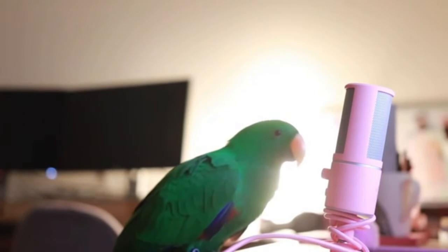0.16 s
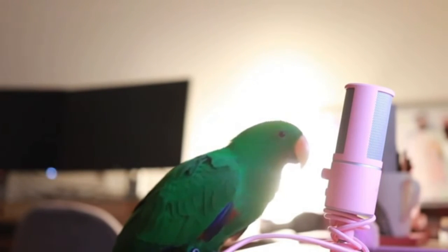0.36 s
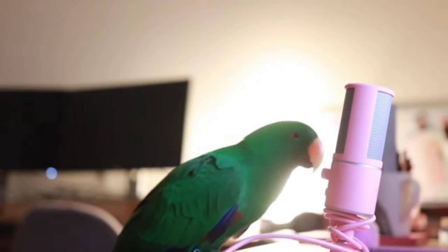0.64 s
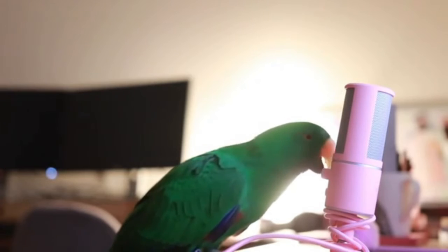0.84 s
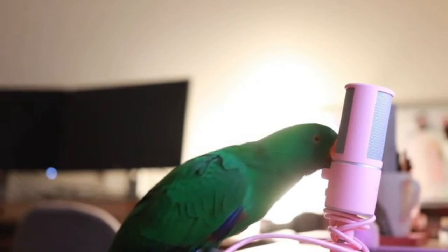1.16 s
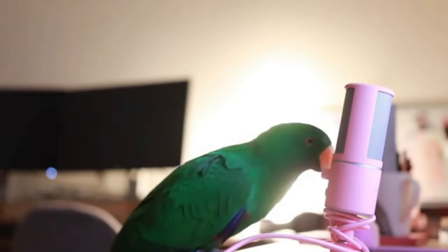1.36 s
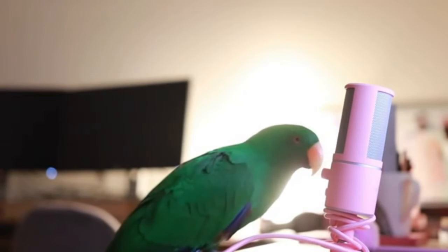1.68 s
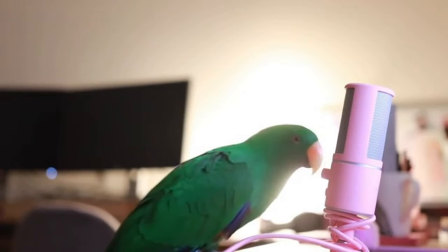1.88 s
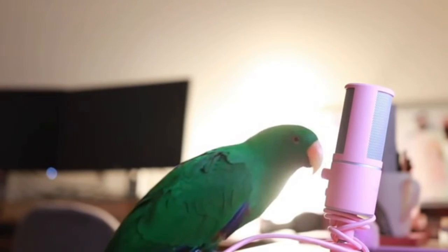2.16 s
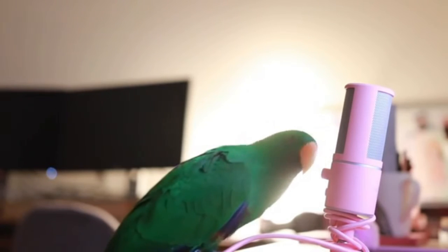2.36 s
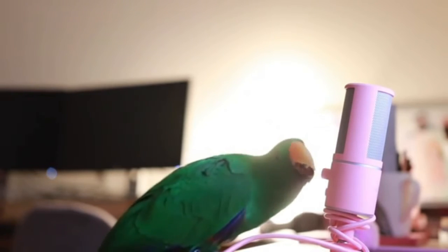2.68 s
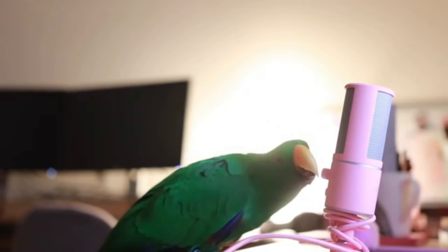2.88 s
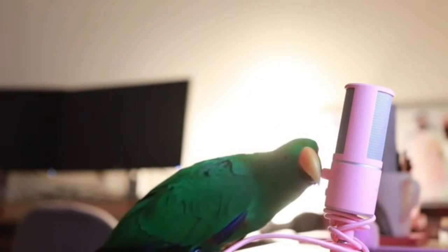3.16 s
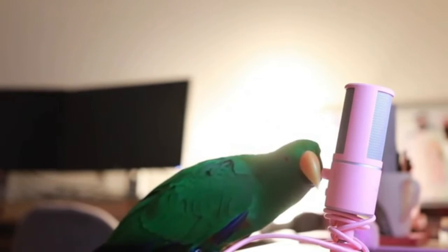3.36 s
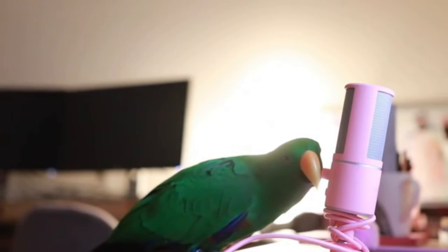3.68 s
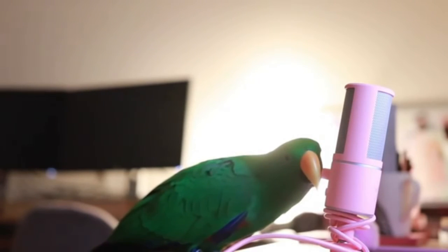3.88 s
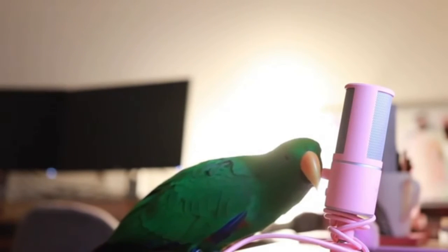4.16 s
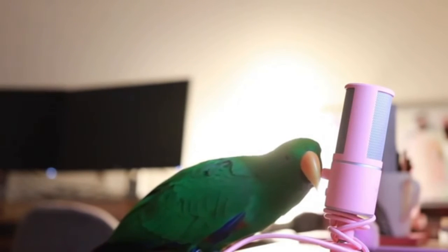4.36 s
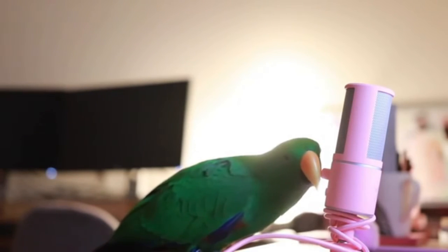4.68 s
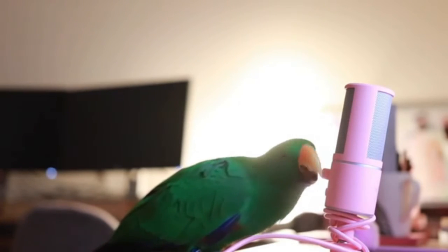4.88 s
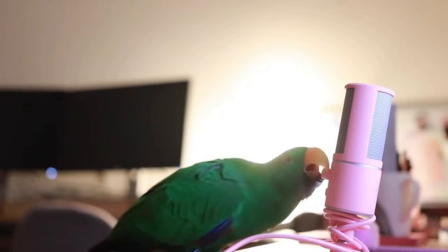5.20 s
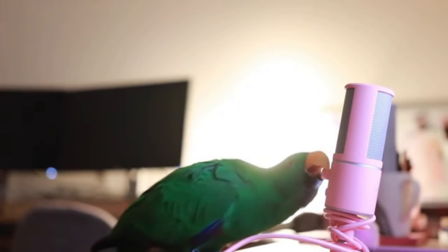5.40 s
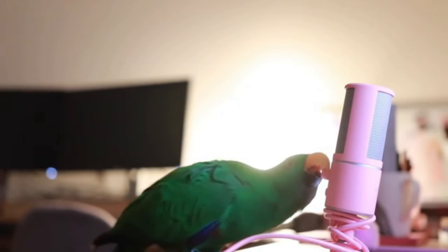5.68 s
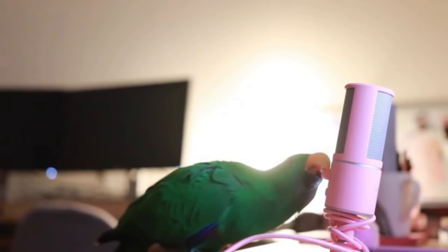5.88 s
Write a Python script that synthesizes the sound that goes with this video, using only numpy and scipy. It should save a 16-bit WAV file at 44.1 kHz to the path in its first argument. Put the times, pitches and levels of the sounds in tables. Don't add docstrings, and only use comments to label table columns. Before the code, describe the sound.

A parrot handles a sprung desk microphone with its beak. At first there is only quiet house hum, airy fan noise and tiny ticks, broken by a sudden clipped squawk. After a calm gap, nudges make the mount thud and sway with a deep rumble. Popping, hollow clucks come at regular intervals and grow strong, then the beak scrapes, knocks and creaks the ringing casing. Close, dry sound with short room echoes.

```python
import sys
import numpy as np
from scipy import signal
from scipy.fft import rfft, irfft
from scipy.io import wavfile
from scipy.ndimage import uniform_filter1d

SR = 44100
rng = np.random.default_rng(int(sys.argv[2]) if len(sys.argv) > 2 else 0)


def to_wav(sig):
    pcm = np.clip(np.atleast_2d(sig), -1, 1) * 32767
    pcm = np.round(pcm).astype(np.int16)
    wavfile.write(sys.argv[1], SR, pcm.T)


def volts_from_db(level):
    exponent = np.asarray(level, float) / 20
    return 10 ** exponent


N = 266364
T = np.arange(N) / SR

# pitch_hz, level_db (per Hz)
HUM = [(12, -27), (20, -1.5), (32, -2.5), (49, -15), (97, -6.5), (141, -13), (166, -20.5), (269, -17),
       (409, -27), (500, -27), (650, -56), (1100, -120)]
# pitch_hz, level_db (per Hz)
AIR = [(290, -28.5), (500, 0), (545, -10.5), (576, -5), (823, -3.5), (1020, -5.5), (1390, -5), (1680, -9),
       (2170, -5), (2760, -14), (3410, -12.5), (4740, -21.5), (6210, -26.5), (15000, -30.5)]
HUM_DB, AIR_DB = -48.5, -62.5
# start_s, length_s, start_level_db, end_level_db
RUFFLES = [
    (0.303, .65, -95.5, -73),
    (0.973, 0.59, -79, -78),
    (2.491, 0.34, -71.5, -69.5),
    (2.875, 0.031, -68, -71),
    (2.917, .16, -74, -71),
    (5.42, .3, -74, -74),
    (5.8, .24, -74, -72),
]
RUFFLE_ATTACK_S, RUFFLE_RELEASE_S = 0.02, 0.023
# start_s, peak_db, centre_hz,
# casing_share_db
TICKS = [(0.7389, -54, 2160, -3), (1.3294, -52, 2220, -13.5), (1.4552, -22, 2561, -29.5),
         (2.815, -47, 2100, -17), (2.8842, -38.5, 2160, -25), (2.9078, -38, 2080, -17),
         (3.1864, -41.5, 2210, 3), (3.2476, -51, 2170, 3), (3.527, -34.5, 2130, -9.5),
         (4.8878, -32, 1700, -23), (4.9523, -32.5, 2280, -4), (5.1482, -19, 4150, -4),
         (5.3579, -29.5, 2240, -14), (5.5122, -41.5, 2500, -23), (5.7075, -39.5, 2100, -5),
         (5.7413, -33, 2320, -8.5), (5.8167, -44.5, 2220, 4.5), (5.908, -39.5, 2580, -26)]
# start_s, peak_db, centre_hz
SNAPS = [(1.33, -58, 6000), (2.8875, -45.5, 5970), (2.908, -45, 5200), (3.1873, -44, 7260),
         (4.8883, -46, 6160), (5.1062, -41, 9700), (5.1454, -43, 6440), (5.356, -41.5, 5975),
         (5.487, -51, 4860), (5.7412, -43.5, 8050), (5.817, -48, 6160)]
TICK_DIE_MS, SNAP_DIE_MS, SNAP_RING_DB = 1.5, 0.7, -20
# pitch_hz, width_hz, level_db
CASING = [(417, 51, -12), (690, 47, -6), (945, 50, -8), (1220.4, 65, -8), (1610, 70, -6.5),
          (2220, 90, -1.5), (2500, 22, -16.5), (3004, 34, -19.5), (2990, 190, -16.5), (4150, 85, -4),
          (4280, 75, -13.5), (5602, 150, -27), (6160, 207.2, -26)]
# start_s, end_s, pitch_hz, slack_s (pitch lets go), slowing_s (period grows e-fold), level_db
SQUAWK = (1.4579, 1.4912, 1585, 1.4733, 0.0085, 10.1)
# pitch_hz, width_hz, level_db
SQUAWK_THROAT = [(605, 740, -7.5), (1450, 800, -0.5), (2160, 650, -7), (3150, 700, 1.5), (4350, 620, -6)]
# pitch_hz, width_hz, level_db
SLACK_THROAT = [(596, 600, -6), (1380, 950, -3), (2246, 1100, -0.5), (3200, 300, 0.5), (4370, 2200, -8.5)]
# pitch_hz, time_to_fall_60_db_s, level_db
ROOM = [(398.6, 0.21, -34), (860, 0.47, -34.5), (1600, 0.52, -37), (2300, 0.28, -35), (3205, .45, -35),
        (4700, .4, -31.5), (6300, 0.27, -33), (10853, .12, -24)]
SCATTER_HZ, SCATTER = 1700, 0.55
# start_s, peak_db, pitch_hz,
# time_to_fall_60_db_s
THUMPS = [(1.488, -31, 94.97, 0.2), (3.186, -16, 117, 0.13), (3.25, -25.5, 102.7, 0.078),
          (3.645, -33.5, 132.7, 0.14), (3.847, -36.5, 145, 0.46), (5.036, -26.5, 131, 0.19),
          (5.082, -26.5, 123.8, 0.1), (5.147, -15.5, 114.5, 0.12), (5.358, -13.5, 120, 0.088),
          (5.499, -27.5, 73.4, 0.1), (5.638, -22.5, 124, 0.089), (5.740, -17.5, 74.7, 0.029),
          (5.933, -21, 100, 0.081), (5.978, -25, 120.6, 0.074)]
# start_s, length_s, start_level_db, end_level_db
SWAYS = [
    (3.2, .3, -32.5, -43),
    (3.52, 0.19, -43, -42.5),
    (3.83, 0.069, -44, -48),
    (4.06, 0.18, -48.5, -41.5),
    (4.31, 0.049, -42, -41.5),
    (4.4, .2, -48.5, -49),
    (4.64, .4, -43, -44),
    (5.15, 0.11, -48.5, -35),
    (5.35, 0.46, -37, -37.5),
    (5.88, 0.14, -36, -38),
]
SWAY_HZ, SWAY_ATTACK_S, SWAY_RELEASE_S = 29.8, 0.01, 0.014
LEAN_FROM_S, LEAN_DB, SHAKE_PER_RUB, SHAKE_DB = 3.19, -48.5, 0.58, -15.5
# start_s,
# length_s, level_db, centre_hz
CREAKS = [(3.185, 0.0052, -39.5, 718), (3.247, .045, -47, 1130), (3.317, .1, -52, 426),
          (3.395, 0.064, -54.5, 713), (3.498, 0.039, -50, 450), (4.948, 0.091, -49, 1170),
          (4.953, 0.089, -47.5, 477), (5.189, .035, -57.5, 890), (5.262, .09, -50.5, 840),
          (5.638, 0.016, -55, 750), (5.943, 0.061, -51.5, 542)]
CREAK_WIDTH, CREAK_EDGE_S = 0.3, 0.0037
# start_s, length_s, start_level_db, end_level_db, body_pressure_db
STROKES = [(3.188, 0.01, -71, -70, -5), (3.251, 0.048, -56.5, -60, 4.5), (3.367, 0.038, -72, -62, 8),
           (3.417, 0.087, -57.5, -69.5, 2.5), (3.518, 0.037, -59.5, -61, 3), (4.185, .015, -77, -71, -6),
           (4.259, 0.021, -80, -66.5, 12), (4.35, .02, -67, -72, -4), (4.598, 0.03, -68.5, -63.5, 3),
           (4.767, .018, -75, -78, 4), (4.905, 0.052, -62, -51, -2.5), (4.957, 0.132, -53.5, -46, 1),
           (5.155, 0.0091, -33, -60, -7.5), (5.193, 0.025, -61, -56.5, -6), (5.268, 0.083, -55, -46, 1),
           (5.349, 0.012, -49, -50.5, -3), (5.389, .23, -70.5, -69.5, -0.5), (5.628, .018, -68.5, -58, 0),
           (5.706, .015, -65, -82, 7), (5.741, 0.025, -61, -73, 4), (5.797, 0.055, -64, -63.5, -1),
           (5.927, 0.076, -66.5, -64, 4.5), (6.018, 0.026, -68, -75.5, -1)]
STROKE_ATTACK_S, STROKE_RELEASE_S = 0.004, 0.0045
# pitch_hz, level_db (per Hz)
CASING_SKIN = [(150, -29.5), (250, -12.5), (1220, -18), (1350, -14.5), (2200, -5), (3300, -15.5),
               (4230, -13), (5010, -24.5), (14000, -45)]
SPOT_RATE_HZ, SPOT_DB = 16, 3.5
# start_s (opening pulse), peak_db, pitch_hz, rise_per_ms, hold_ms
CLUCKS = [
    (3.6090, -17, 1750, 0.19, 1.4),
    (3.7873, -11.5, 1450, 0.15, .9),
    (3.9531, -11, 1497, 0.023, 0.87),
    (4.1126, -7, 1450, 0.0098, 0.99),
    (4.2783, -5.5, 1450, 0.024, 0.97),
    (4.4468, -6, 1625, 0.058, 1.7),
    (4.6176, -3, 1610, 0.051, 2.66),
    (4.7849, 0.5, 1478, 0.09, 4.23),
]
CLUCK_DIE_MS = 0.59
# pitch_hz, width_hz, level_db
BEAK_CAVITY = [(5000, 780, 2.5), (6340, 590, 7.5), (11710, 860, -12)]
# pitch_hz, width_hz, level_db
CHEST = [(401, 180, 4.5), (1136, 150, -1)]
# delay_ms, level_db
DESK = [(1.448, -19), (2.6, -24.5), (4.1, -24)]


def level(x, db):
    return x * volts_from_db(db) / np.sqrt(np.mean(x ** 2))


def ring(x, hz, width):
    return signal.lfilter(*signal.iirpeak(hz, hz / max(width, 5), SR), x)


def narrow(x, hz, width):
    return ring(ring(x, hz, width), hz, min(9 * width, hz))


def body(x, modes):
    return sum((-1) ** k * volts_from_db(db) * ring(x, hz, width) for k, (hz, width, db) in enumerate(modes))


def coloured(x, points):
    hz, db = np.transpose(points)
    f = np.maximum(np.fft.rfftfreq(len(x), 1 / SR), 1)
    return irfft(rfft(x) * volts_from_db(np.interp(np.log(f), np.log(hz), db)), len(x))


def walk(rate):
    k = int(SR / rate)
    steps = np.repeat(rng.standard_normal(N // k + 1), k)
    return uniform_filter1d(uniform_filter1d(steps, k), k)[:N] * 4 / 3


def held(start, length, from_db, to_db, attack, release):
    before = np.minimum(T - start, 0)
    after = np.maximum(T - start - length, 0)
    slide = volts_from_db(np.interp(T, [start, start + length], [from_db, to_db]))
    return slide * np.exp(before / attack - after / release)


def add(out, s, x):
    i = int(s * SR)
    out[i:i + len(x)] += x[:len(out) - i]


def air():
    hum = level(coloured(rng.standard_normal(N), HUM), HUM_DB) * volts_from_db(1.5 * walk(2.5))
    hiss = level(coloured(rng.standard_normal(N), AIR), AIR_DB)
    ruffles = volts_from_db(-90) + sum(held(*row, RUFFLE_ATTACK_S, RUFFLE_RELEASE_S) for row in RUFFLES)
    rustle = level(ring(rng.standard_normal(N), 5600, 9000), -2.5) * ruffles * volts_from_db(1.2 * walk(30))
    whine = level(ring(rng.standard_normal(N), 6400, 900), -83.5)
    top = signal.butter(10, 14900, fs=SR, output="sos")
    return signal.sosfilt(top, hum + hiss + rustle + whine)


def ticks():
    knocks, clicks, t = np.zeros(N), np.zeros(N), np.arange(512) / SR
    hits = [(*row, TICK_DIE_MS) for row in TICKS]
    hits += [(*row, SNAP_RING_DB, SNAP_DIE_MS) for row in SNAPS]
    for s, db, hz, ring_db, die_ms in hits:
        grit = rng.standard_normal(len(t))
        burst = grit * np.exp(-t * 1000 / die_ms) * np.clip(t / 0.00013, 0, 1)
        click = ring(ring(burst, hz, 0.13 * hz), hz, hz)
        add(clicks, s, volts_from_db(db) * click / np.abs(click).max())
        add(knocks, s, volts_from_db(db + ring_db) * burst)
    return clicks + volts_from_db(23.0) * body(knocks, CASING)


def squawk():
    start, end, hz, slack, slowing, db = SQUAWK
    t = start + np.arange(8192) / SR
    slackening = np.exp(np.clip(t - slack, 0, end - slack) / slowing)
    stretch = slackening - 0.15 * np.exp(-(t - start) / 0.0011)
    phase = np.cumsum(hz / stretch) / SR
    pulse_width = 0.00003 * stretch ** 0.29
    since = (phase % 1) * stretch / hz / pulse_width
    fade = np.exp(-np.maximum(t - slack, 0) / 0.027)
    effort = np.clip((t - start) / 0.002, 0.3, 1) * fade * (t < end)
    breath = rng.standard_normal(len(t))
    flow = -effort * since * np.exp(-since) * (1 + 0.05 * breath)
    closing = np.clip((t - slack) / 0.0047, 0, 1)
    voice = body(flow * (1 - closing), SQUAWK_THROAT) + body(flow * closing, SLACK_THROAT)
    voice += volts_from_db(-36) * ring(effort * breath, 6400, 3100)
    voice += volts_from_db(-4.5) * ring(flow, 110, 16) + volts_from_db(-10.5) * ring(flow, 220, 150)
    out = np.zeros(N)
    add(out, start, volts_from_db(db) * voice / np.abs(voice).max())
    return out


def room(x):
    t = np.arange(SR // 2) / SR
    tail = 0
    for hz, t60, db in ROOM:
        band = ring(ring(rng.standard_normal(len(t)), hz, hz), hz, hz) * 1000. ** (-t / t60)
        tail = tail + volts_from_db(db) * band / np.sqrt(np.sum(band ** 2))
    return signal.fftconvolve(x, tail * np.clip(t / 0.0077 - 0.25, 0, 1))[:N]


def strokes():
    rub, press = np.zeros(N), np.zeros(N)
    for *row, press_db in STROKES:
        stroke = held(*row, STROKE_ATTACK_S, STROKE_RELEASE_S)
        rub += stroke
        press += stroke * volts_from_db(press_db)
    return rub, press


def mount():
    lean = volts_from_db(LEAN_DB) * (T > LEAN_FROM_S) + volts_from_db(SHAKE_DB) * strokes()[0] ** SHAKE_PER_RUB
    shake = level(ring(ring(rng.standard_normal(N), 100, 49), 76, 120), 0.37) * lean
    pushes = sum(held(*row, SWAY_ATTACK_S, SWAY_RELEASE_S) for row in SWAYS)
    sway_phase = 2 * np.pi * np.cumsum(SWAY_HZ + 2.6 * walk(5.1)) / SR
    sway = np.sin(sway_phase) * pushes * volts_from_db(5.0)
    out, t = shake + sway, np.arange(8192) / SR
    for s, db, hz, t60 in THUMPS:
        push = (1 - np.exp(-(t / 0.0027) ** 2)) * 1000. ** (-t / t60)
        thud = push * (np.sin(2 * np.pi * hz * t - 2.2) + 0.23 * np.sin(2 * np.pi * 0.54 * hz * t))
        add(out, s, volts_from_db(db) * thud / np.abs(thud).max())
    return out


def creaks():
    slips = rng.standard_normal(N) * volts_from_db(3.3 * walk(90))
    out = np.zeros(N)
    for s, length, db, hz in CREAKS:
        panel = ring(ring(slips, hz, CREAK_WIDTH * hz), hz, hz)
        out += level(panel, db) * held(s, length, 0, 0, CREAK_EDGE_S, CREAK_EDGE_S)
    return out


def wandering_ring(x, modes):
    out = np.zeros(N)
    for hz, width, db in modes:
        spot = volts_from_db(SPOT_DB * walk(SPOT_RATE_HZ))
        out += volts_from_db(db) * narrow(x * spot, hz, width)
    return out


def rubbing():
    rub, press = strokes()
    slips = level(rng.standard_normal(N) * volts_from_db(2.9 * walk(400) + 1.5 * walk(60)), 0)
    slips, pressed = slips * rub, slips * press
    lower = [mode for mode in CASING if mode[0] < 3500]
    upper = [mode for mode in CASING if mode[0] >= 3500]
    metal = wandering_ring(pressed, lower) + wandering_ring(slips, upper)
    skin = coloured(pressed * volts_from_db(1.5 * walk(40)), CASING_SKIN)
    grit = ring(ring(slips, 9500, 5000), 9500, 7000) * np.sqrt(rub / rub.max())
    return volts_from_db(24.5) * metal + volts_from_db(21.5) * skin + volts_from_db(-13.5) * grit


def clucks():
    out, t = np.zeros(N), np.arange(1024) / SR * 1000 - 1
    duller = signal.butter(6, 2750, fs=SR, output="sos")
    for s, db, hz, rise, hold in CLUCKS:
        pulse = np.exp(-np.where(t < 0, (t / 0.21) ** 2, t / 0.22))
        opening = -volts_from_db(0.16 * db - 12.0) * np.cos(2 * np.pi * 1.5 * t) * pulse
        since = np.maximum(t - 0.72, 0)
        phase = 2 * np.pi * hz / 1000 * (since + rise * since ** 2 / 2)
        swell = np.clip(since / 0.52, 0, 1) * np.exp(-np.maximum(since - hold, 0) / CLUCK_DIE_MS)
        beats = volts_from_db(db) * swell * (np.sin(phase) + 0.25 * np.sin(phase / 2 + 2.0) + 0.051)
        breath = rng.standard_normal(len(t))
        puff = breath * (swell + 1.1 * np.abs(opening) / np.abs(opening).max())
        cavity = sum(volts_from_db(gain_db) * ring(ring(puff, f, width), f, width) for f, width, gain_db in BEAK_CAVITY)
        voice = signal.sosfilt(duller, opening + beats)
        chest = sum(volts_from_db(gain_db) * ring(voice, f, width) for f, width, gain_db in CHEST)
        voice = voice + chest + volts_from_db(2.5 * db - 17.5) * cavity
        add(out, s - 0.0012, voice)
        for ms, echo_db in DESK:
            add(out, s - 0.0012 + ms / 1000, volts_from_db(echo_db) * ring(voice, 1500, 2100))
    return out


def scene():
    voice = squawk() + clucks()
    echo = room(voice * (1 + SCATTER * walk(SCATTER_HZ))) * volts_from_db(-3.0)
    capsule = air() + ticks() + voice + echo + mount() + creaks() + rubbing()
    grain = volts_from_db(-49.5) * rng.standard_normal(N) * np.array([[1], [-1]])
    return capsule * (1 + grain)


def band_limit(x):
    return signal.sosfilt(signal.butter(12, 15910, fs=SR, output="sos"), x)


def record(dry):
    clipped = dry / (1 + np.abs(dry) ** 40) ** (1 / 40)
    top = signal.ellip(8, 0.1, 60, 15600, fs=SR, output="sos")
    mix = np.clip(signal.sosfilt(top, clipped), -1, 1)
    return band_limit(mix)


dry = scene()
out = record(dry)
to_wav(out)
```